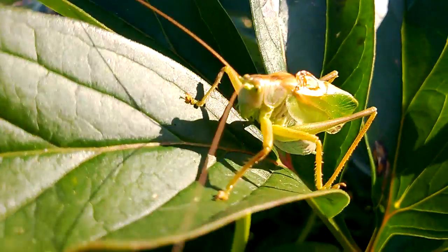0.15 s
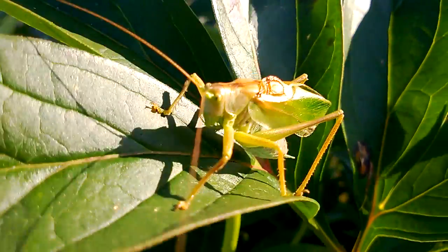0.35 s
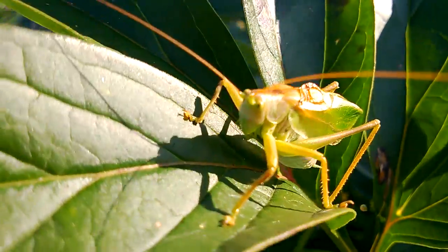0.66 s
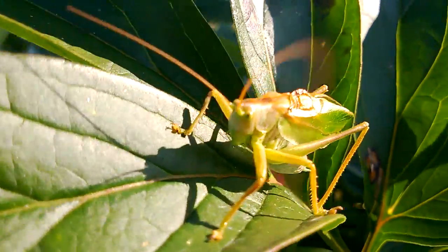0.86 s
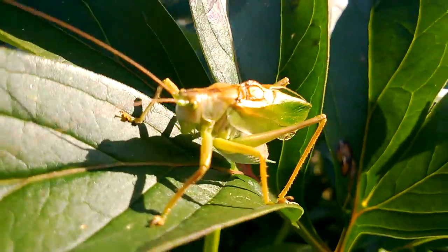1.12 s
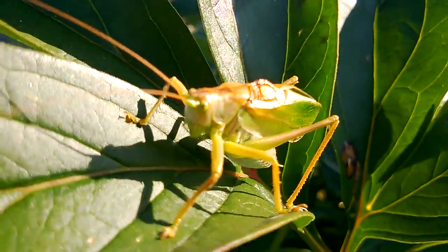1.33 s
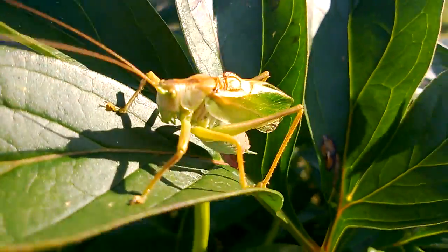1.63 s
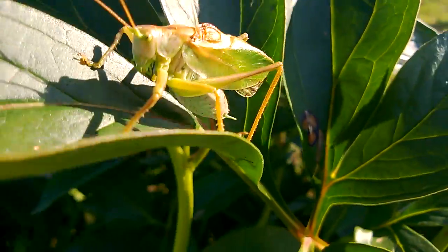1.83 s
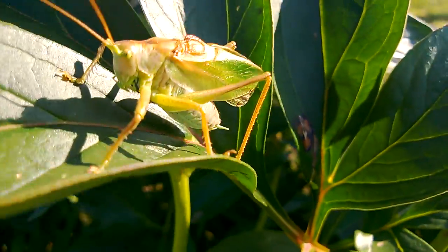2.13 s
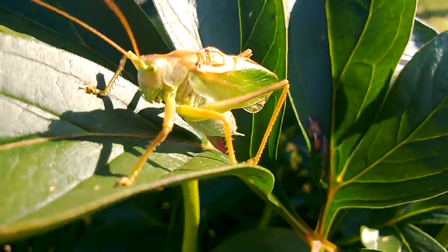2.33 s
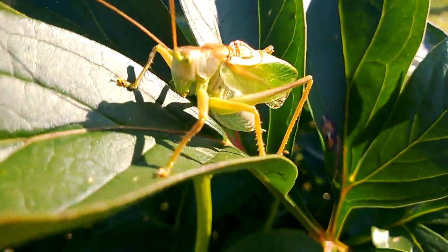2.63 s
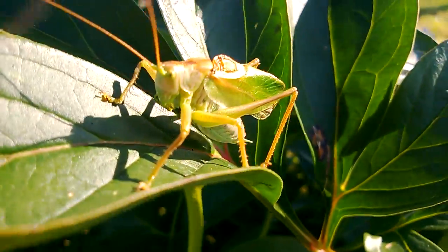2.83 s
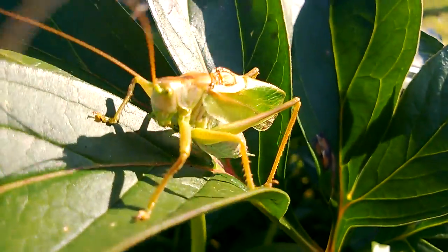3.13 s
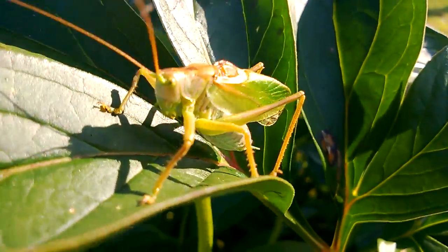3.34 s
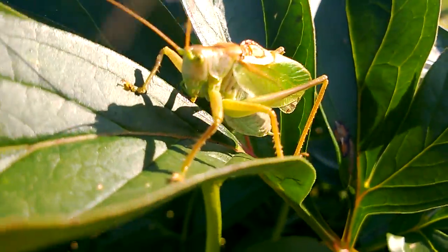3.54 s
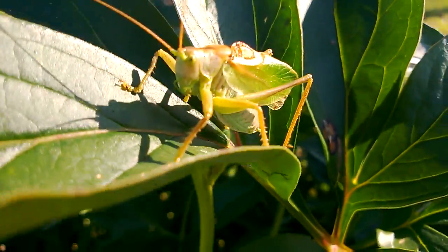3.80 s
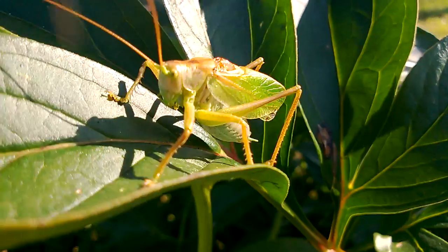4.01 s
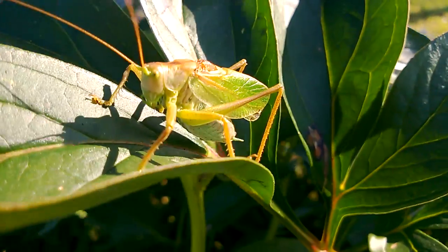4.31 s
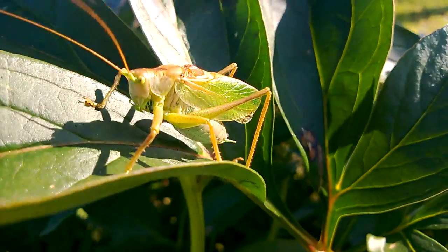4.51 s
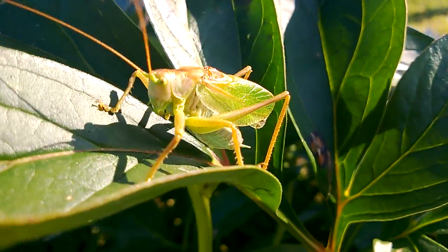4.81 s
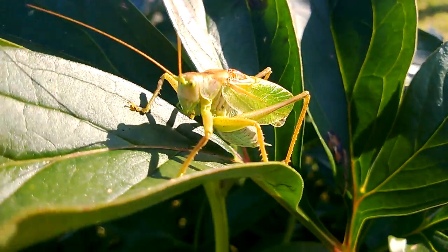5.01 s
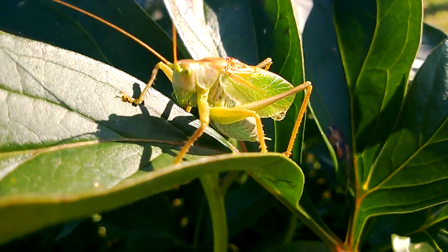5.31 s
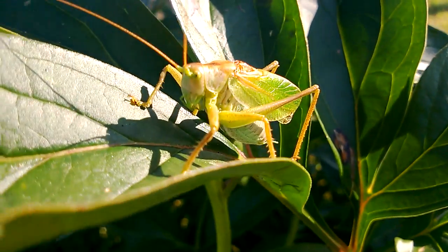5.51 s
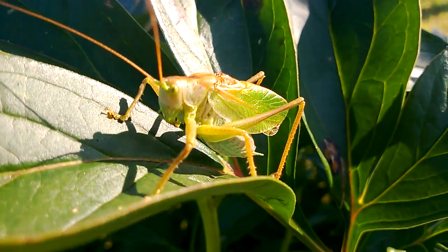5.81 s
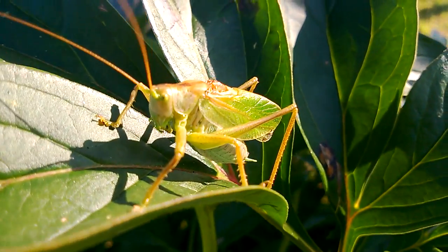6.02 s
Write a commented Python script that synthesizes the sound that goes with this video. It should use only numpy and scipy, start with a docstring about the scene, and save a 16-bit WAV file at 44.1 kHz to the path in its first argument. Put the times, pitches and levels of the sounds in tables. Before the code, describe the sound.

Wind rumbles against an unprotected microphone among leaves while an insect right beside it begins a rapid, bright, ticking trill, dry and metallic, with uneven harder snaps standing out. The gusts weaken as the trill continues. It ends abruptly around four seconds, leaving a few dull, weak puffs and a very quiet open-air hiss. In the final half second a faint far hum, perhaps a car, swells slightly.

```python
"""Bush-cricket on a leaf

A green bush-cricket sings very close, about fifty wing strokes a second, stopping dead after four seconds.
Each stroke: the scraper slips along the file in a few snaps that ring the wing, then rasps softly back.
Wind buffets the microphone as shaped noise and push-pull pulses, then dies away,
leaving a quiet garden hiss and a faint far drone of noise and rising tones, perhaps a car."""
import sys
import numpy as np
from scipy import signal
from scipy.fft import rfft, irfft, next_fast_len
from scipy.io import wavfile
from scipy.ndimage import uniform_filter1d, map_coordinates

SR = 44100
rng = np.random.default_rng(int(sys.argv[2]) if len(sys.argv) > 2 else 0)


def output_pcm(signal):
    """Save a mono or channel-first signal as 16-bit PCM at the path in sys.argv[1].

    Samples are clipped to [-1, 1] before scaling.
    """
    pcm = np.clip(np.atleast_2d(signal).T, -1, 1) * 32767
    wavfile.write(sys.argv[1], SR, np.round(pcm).astype(np.int16))


N = 271215
# Colours are relative; "before trim" levels get one more common offset in the function that uses them.

# garden air, colour: (frequency [Hz], relative level [dB])
AIR_COLOUR = [(20, 9.5), (100, 10), (250, 5), (450, 1), (900, -2), (1400, -7.5), (2300, -10), (3400, -12),
              (4500, -5.5), (5200, -9), (6500, -16), (10000, -23), (16000, -27.5)]
# garden air, rms: (time [s], level [dB])
AIR_LEVEL = [(0, -73), (4.3, -73.5), (4.95, -71.5), (5.4, -73.5), (6.15, -71.5)]
# light wind between the gusts, before trim: (time [s], level [dB])
BREEZE = [(0, -53.5), (.1, -34), (1.55, -33.5), (1.64, -48.5), (3.6, -46), (3.75, -58.5), (4.0, -48.5),
          (4.35, -61.5), (5.5, -61), (5.85, -69), (6.15, -61)]
# gusts on the microphone, before trim: (start [s], length [s], level [dB], extra flutter [dB])
GUSTS = [(0.089, 0.13, -29, -3), (0.262, 0.076, -27, 3), (0.396, 0.165, -28.5, -2),
         (0.657, 0.11, -24.5, -3), (0.815, 0.2, -27.0, -1.5), (1.128, 0.19, -28, -2),
         (1.34, 0.051, -25.0, 4), (1.426, 0.15, -27, 0.5), (1.682, 0.04, -40.5, -0.5),
         (1.773, 0.15, -39.5, 1), (2.036, 0.125, -35, 0.5), (2.241, 0.085, -35.5, 5),
         (2.406, 0.02, -38.5, -2), (2.56, 0.13, -32.5, 3), (2.751, 0.23, -37, -2.5),
         (3.05, 0.066, -32.5, -4), (3.182, 0.14, -42.0, 1.5), (3.377, 0.07, -38.5, 5.5),
         (3.477, 0.078, -32.5, 2.5), (3.601, 0.061, -40, 5), (3.839, 0.07, -37, -6),
         (3.956, 0.035, -43.0, 8), (4.041, 0.1, -34, 6), (4.215, 0.069, -39, -2.5),
         (4.387, 0.055, -41.5, -10), (4.6, 0.08, -50.5, -0.5), (4.821, 0.06, -52, -0.5),
         (4.952, 0.076, -50.5, 0), (5.14, 0.14, -56.5, 0), (5.351, 0.1, -52.5, 0),
         (6.054, 0.05, -53.0, -0.5)]
# deep wind noise, colour: (frequency [Hz], relative level [dB])
RUMBLE_COLOUR = [(12, -37), (20, -5), (59, 4.5), (144, -4), (220, -12.5), (290, -39), (480, -120)]
# higher wind noise, colour: (frequency [Hz], relative level [dB])
FLUTTER_COLOUR = [(130, -33.5), (210, 2.5), (310, -3.5), (500, -18), (800, -33), (1200, -40), (2000, -56.5)]
# weakest wind puffs, colour: (frequency [Hz], relative level [dB])
PUFF_COLOUR = [(15, -3.5), (30, -0.5), (60, -2.5), (100, -10.5), (150, -20), (250, -39)]
# wing beat: (time [s], rate [strokes/s])
PACE = [(.2, 46.18), (.35, 50.26), (.7, 50.73), (1.5, 50.12), (2.0, 49.87), (2.6, 51.14), (3.3, 49.55),
        (3.7, 48.52), (4.0, 43.91)]
# ordinary strokes, before trim: (time [s], level [dB])
EFFORT = [(0.2, -61.5), (0.245, -48), (0.26, -38.5), (0.45, -34), (0.63, -32.5), (0.76, -27), (1.35, -26),
          (1.64, -27.5), (1.76, -24.5), (2.1, -28.5), (2.6, -29.5), (3.0, -28.5), (3.25, -30), (3.62, -28),
          (4.0, -32)]
# hard catches on every n-th stroke, before trim: (first catch [s], last catch [s], n [strokes], level [dB])
CATCHES = [(0.26, 0.346, 4, -30.5), (0.448, 0.683, 2, -26), (0.978, 1.178, 2, -25.5),
           (1.238, 1.339, 5, -22.5), (1.496, 1.593, 5, -23.5), (1.674, 1.754, 2, -21.5),
           (1.815, 1.855, 2, -20.7), (1.896, 1.997, 1, -23), (2.038, 2.274, 3, -22), (2.315, 2.432, 2, -22),
           (2.492, 2.649, 2, -21.3), (2.806, 2.825, 1, -23.5), (2.943, 3.026, 1, -24),
           (3.063, 3.084, 1, -23.5), (3.145, 3.204, 3, -22.3), (3.244, 3.324, 1, -23.3),
           (3.384, 3.467, 2, -25), (3.735, 3.777, 2, -26)]
# basic wing response on closing: (frequency [Hz], relative level [dB])
CLOSING_COLOUR = [(1650, -73.5), (2800, -44.5), (4240, -34), (5890, -20.5), (6430, -21), (6820, -14.5),
                  (7330, -4), (7720, -1.5), (9130, -5.5), (10000, -9), (11300, -17), (12700, -19.5),
                  (14600, -17.5), (16000, -23.5)]
# basic wing response on opening: (frequency [Hz], relative level [dB])
OPENING_COLOUR = [(1200, -38.5), (3200, -39), (5200, -26.5), (5900, -14), (6900, -25), (8000, -8),
                  (9000, 1), (9900, -8.5), (11500, -15.5), (16000, -17.5)]
# narrow resonances of the wing cells: (frequency [Hz], width [Hz], lift [dB])
WING_CELLS = [(5950, 97, 2), (9040, 230, 2.5), (12000, 300, 2.5), (13100, 250, 1), (14800, 300, 2)]
# treble of the wing response, relative: (time [s], around 10 kHz [dB], around 14 kHz [dB])
TREBLE = [(.2, -8.5, -12), (.5, -4, -6.5), (.75, 2.5, -5), (1.5, 1.5, -4.5), (1.8, -0.5, 0.5),
          (2.5, -1, -0.5), (3.3, -1, -1.5), (3.6, 7.5, 4), (4.0, -2, 3.5)]
# faint dry hiss under the song, colour: (frequency [Hz], relative level [dB])
HUSH_COLOUR = [(700, -26), (1300, -11.5), (1900, -3.5), (2600, -2.5), (3400, -4.5), (5000, -11.5)]
# single eddies striking the port, before trim: (time [s], peak [dB])
BUFFETS = [(0.686, -13), (0.712, -18), (0.824, -16.5), (0.845, -12.5), (0.93, -18.5), (1.205, -19),
           (1.248, -15.5), (1.348, -12), (1.357, -13.5), (1.388, -13), (1.442, -17.5), (1.552, -15),
           (2.584, -21.5), (2.658, -23), (3.101, -26.5), (4.129, -33)]
# hardest catches jolting the leaf, peak of the noise envelope: (time [s], level [dB])
JOLTS = [(1.816, -55), (2.355, -53), (3.085, -47)]
# dull tick of the leaf, colour: (frequency [Hz], relative level [dB])
LEAF_TICK_COLOUR = [(250, -9), (650, 0), (1100, -5.5), (2000, -14), (3500, -13.5)]
# far drone, common gain of its noise and tones: (time [s], gain [dB])
DRONE_GAIN = [(0, -110), (5.2, -97), (5.5, -81), (5.75, -75.5), (5.98, -72.5), (6.15, -78.5)]
# noise part of the drone, colour: (frequency [Hz], relative level [dB])
DRONE_COLOUR = [(400, -25.5), (540, -4), (630, -2), (690, -6.5), (730, -1.5), (770, -6.5), (830, 1),
                (940, -3.5), (1020, -4), (1200, -6.5), (1450, -28)]
# faint tones in the drone: (frequency at DRONE_PITCH_S [Hz], amplitude before the drone gain [dB])
DRONE_TONES = [(540, -14), (630, -10), (725, -10.5), (820, -9), (900, -14.5)]

TIME = np.arange(N) / SR
STROKE_SIZE = 2048     # samples in the frame of one stroke
STROKE_TIME = (np.arange(STROKE_SIZE) - STROKE_SIZE // 2) / SR
STROKE_HZ = np.arange(STROKE_SIZE // 2 + 1) * SR / STROKE_SIZE

# a gust is stronger in its middle than at its ends by GUST_ARCH_DB
GUST_ATTACK_S, GUST_RELEASE_S, GUST_ARCH_DB = .008, .013, 2.5
# flutter level at a given wind level; its dB per dB of wind
FLUTTER_DB, FLUTTER_AT_DB, FLUTTER_GROWTH = -47.5, -30.0, 1.7
# below CALM_DB the wind turns into dull puffs, fully so over CALM_RANGE_DB
CALM_DB, CALM_RANGE_DB = -43.0, 7.0
FIRST_STROKE_S = .2015
# as the song goes on the slips spread apart, the return stroke grows and the low ring fades
SLIP_GAP_S, SLIP_SPREAD_S_PER_S = .0012, .00053
RETURN_DB, RETURN_RISE_DB_PER_S = -19.5, 3
LOW_RING_DB, LOW_RING_FADE_DB_PER_S = 5.5, 3
FIRST_RING_DB, FIRST_RING_S = 12, .12     # extra low ring in the first strokes; its decay time
RETURN_DELAY_S, RETURN_LAG = .0073, 1     # at the usual period; share of any extra period added to it
USUAL_PERIOD_S, USUAL_DB = .02, -28.5
MAIN_RING_DB, RING_DB_PER_DB = 1.25, .7     # at USUAL_DB; harder singing rings the mirror more
DRONE_RISE_PER_S, DRONE_PITCH_S = .05, 7.3     # share by which the tones climb; time of their listed pitch
CUTOFF_HZ = 15900


def from_db(db):
    """Decibels to gain."""
    return 10 ** (np.asarray(db) / 20)


def rms_one(x):
    """Each row scaled to rms 1."""
    return x / np.sqrt(np.mean(x ** 2, axis=-1, keepdims=True) + 1e-30)


def read(rows, times):
    """Columns of a curve at the given times."""
    s, *columns = np.transpose(rows)
    return [np.interp(times, s, column) for column in columns]


def at_hz(points, hz):
    """Spectrum in dB, joined on a log-frequency axis."""
    f, db = np.transpose(points)
    return np.interp(np.log(hz + 1), np.log(f), db)


def bell(x, centre, width):
    """Smooth hump of height 1."""
    return np.exp(-.5 * ((x - centre) / width) ** 2)


def noise(colour):
    """Steady coloured noise, rolled off around its last point; rms 1."""
    size = next_fast_len(N, real=True)
    hz = np.arange(size // 2 + 1) * SR / size
    rolloff = 1 + (hz / colour[-1][0]) ** 4
    gain = from_db(at_hz(colour, hz)) / rolloff
    white = rng.standard_normal(size)
    return rms_one(irfft(rfft(white) * gain, size)[:N])


def drift(rate_hz):
    """Slow random curve with rms 1, one new knot per 1 / rate_hz."""
    knots = rng.standard_normal(2000)
    return rms_one(np.interp(TIME * rate_hz, np.arange(len(knots)), knots))


def garden_air():
    """Soft outdoor hiss: coloured noise at a slowly changing level."""
    return from_db(read(AIR_LEVEL, TIME)[0]) * noise(AIR_COLOUR)


def wind_level():
    """Breeze plus gusts that rise, arch and fall: level and extra flutter, in dB."""
    power, extra_sum = from_db(read(BREEZE, TIME)[0]) ** 2, 0
    for start_s, length_s, db, extra_db in GUSTS:
        since_s = TIME - start_s
        before = np.maximum(-since_s, 0) / GUST_ATTACK_S
        after = np.maximum(since_s - length_s, 0) / GUST_RELEASE_S
        fade = np.exp(-np.minimum(before + after, 20))
        arch = np.sin(np.pi * np.clip(since_s / length_s, 0, 1)) - 2 / np.pi     # mean zero
        gust_power = (from_db(db + GUST_ARCH_DB * arch) * fade) ** 2
        power = power + gust_power
        extra_sum = extra_sum + gust_power * extra_db
    return 10 * np.log10(power), extra_sum / power


def wind(lumpy_db, rumble_db, puff_db):
    """Turbulence at the port: dull puffs when weak, lumpy rumble when stronger, flutter in hard gusts."""
    level_db, extra_db = wind_level()
    lumps_db = lumpy_db * drift(55)
    rumble = from_db(level_db + rumble_db + .5 * lumps_db) * noise(RUMBLE_COLOUR)
    flutter_db = FLUTTER_DB + FLUTTER_GROWTH * (level_db - FLUTTER_AT_DB) + extra_db + lumps_db
    flutter = from_db(flutter_db) * noise(FLUTTER_COLOUR)
    puffs = from_db(level_db + puff_db) * noise(PUFF_COLOUR)
    calm = np.clip((CALM_DB - level_db) / CALM_RANGE_DB, 0, 1)
    return np.sqrt(1 - calm) * rumble + flutter + np.sqrt(calm) * puffs


def strokes(jitter_s, uneven_db):
    """Time, level and ordinary level of each stroke; a hard catch replaces the nearest stroke."""
    singing_s = TIME[(TIME >= PACE[0][0]) & (TIME <= PACE[-1][0])]
    turns = np.cumsum(read(PACE, singing_s)[0]) / SR
    whole_turns = np.arange(int(turns[-1]) + 1)
    at_s = FIRST_STROKE_S + np.interp(whole_turns, turns, singing_s - singing_s[0])
    chance = rng.standard_normal((len(at_s), 2))
    usual_db, = read(EFFORT, at_s)
    at_s = at_s + jitter_s * chance[:, 0]
    level_db = usual_db + uneven_db * chance[:, 1]
    for first_s, last_s, every, db in CATCHES:
        first, last = np.argmin(abs(at_s - first_s)), np.argmin(abs(at_s - last_s))
        caught = np.arange(first, last + 1, every)
        at_s[caught] = np.linspace(first_s, last_s, len(caught))
        level_db[caught] = db + uneven_db * chance[caught, 1]
    return at_s, level_db, usual_db


def wing_colour(low_db, ring_db, shoulder_db, treble_db):
    """Wing response per stroke: low ring, the mirror's main ring, a shoulder above it, small cells."""
    fixed_db = at_hz(CLOSING_COLOUR, STROKE_HZ)
    for hz, width_hz, lift_db in WING_CELLS:
        fixed_db = fixed_db + lift_db * bell(STROKE_HZ, hz, width_hz)
    fixed_db = fixed_db - 5.44 * bell(STROKE_HZ, 8180, 1110)     # the tooth rate supplies part of the peak
    low = low_db[:, None] * bell(STROKE_HZ, 3460, 380)
    ring = (ring_db[:, None] - 1.0) * bell(STROKE_HZ, 7820, 492)
    shoulder = shoulder_db[:, None] * bell(STROKE_HZ, 10330, 750)
    treble = (treble_db[:, None] + 2.0) * bell(STROKE_HZ, 14200, 1650)
    return fixed_db + low + ring + shoulder + treble


def resonate(force, response_db):
    """Each stroke rings a causal (minimum-phase) body of the given response; rms 1 per frame."""
    cepstrum = irfft(np.log(from_db(response_db)))
    # fold onto positive time
    cepstrum[..., 1:STROKE_SIZE // 2] *= 2
    cepstrum[..., STROKE_SIZE // 2 + 1:] = 0
    response = np.exp(rfft(cepstrum))
    return rms_one(irfft(rfft(force) * response))


def closing(gap_s, accent_db, colour_db, slip_s, build_db, scatter_db, drag_db, grit, count):
    """The scraper slips in a row of snaps, building to the last; each rakes a few teeth of the file."""
    chance = rng.standard_normal((len(gap_s), count, 3))
    spacing_s = gap_s[:, None] * np.exp(.2 * chance[..., 0])
    starts_s = spacing_s[:, :1] - np.cumsum(spacing_s, axis=1) - .0005     # column 0 is the last snap
    size_db = build_db * starts_s / .0097 + scatter_db * np.tanh(chance[..., 1])
    # an accent snaps hard twice
    size_db[:, 0] += 2.0 + .5 * accent_db
    size_db[:, 1] += 1.1 * accent_db
    starts_s = starts_s + .00018 * accent_db[:, None]
    length_s = slip_s * from_db(.24 * accent_db[:, None])     # accented slips run further
    rasp = rng.choice([-1., 1.], (len(gap_s), STROKE_SIZE))
    force = from_db(drag_db) * bell(STROKE_TIME, -.0035, .0035) * rasp
    for k in range(count):
        age_s = np.maximum(STROKE_TIME - starts_s[:, k, None], 0)
        tooth_hz = 8100 * np.exp(.11 * np.tanh(chance[:, k, 2, None]))
        # the teeth pass nearly regularly, their timing wandering a little
        wander = np.cumsum(.17 * rng.standard_normal(age_s.shape), axis=1)
        rake = np.sin(2 * np.pi * tooth_hz * age_s + wander) + grit * rasp
        envelope = age_s / length_s * np.exp(1 - age_s / length_s)
        force = force + from_db(size_db[:, k, None]) * envelope * rake
    return resonate(force, colour_db)


def opening(delay_s, treble_db, length, glide, whistle):
    """The wings part with a light rasp, its tooth rate falling as they slow; later returns last longer."""
    span_s = length * np.maximum(delay_s[:, None] - .004, .001)
    age = (STROKE_TIME - delay_s[:, None]) / span_s
    tooth_hz = 7300 * (1 - glide * np.tanh(age / 2))
    phase = 2 * np.pi * np.cumsum(tooth_hz, axis=1) / SR
    tones = np.sin(phase) + .99 * np.sin(2 * phase)
    teeth = rng.standard_normal(age.shape) + whistle * tones
    colour_db = at_hz(OPENING_COLOUR, STROKE_HZ) + .5 * treble_db[:, None] * (STROKE_HZ > 11000)
    return resonate(teeth * bell(age, 0, .78), colour_db)


def bush_cricket(trim_db):
    """Closing and opening strokes overlaid at the times of the wing beat."""
    at_s, level_db, usual_db = strokes(jitter_s=.0006, uneven_db=1.1)
    sung_s = np.maximum(at_s - PACE[0][0], 0)
    gap_s = SLIP_GAP_S + SLIP_SPREAD_S_PER_S * sung_s
    delay_s = RETURN_DELAY_S + RETURN_LAG * (1 / read(PACE, at_s)[0] - USUAL_PERIOD_S)
    low_db = LOW_RING_DB - LOW_RING_FADE_DB_PER_S * sung_s + FIRST_RING_DB * np.exp(-sung_s / FIRST_RING_S)
    ring_db = MAIN_RING_DB + RING_DB_PER_DB * np.maximum(usual_db - USUAL_DB, -11)
    shoulder_db, treble_db = read(TREBLE, at_s)
    accent_db = np.clip(level_db - usual_db, 0, 8)
    # hard strokes ring the mirror more
    colour_db = wing_colour(low_db, ring_db + .5 * accent_db, shoulder_db, treble_db - .29 * accent_db)
    shut = closing(gap_s, accent_db, colour_db, slip_s=.00034, build_db=8.0, scatter_db=3.5,
                   drag_db=-9.0, grit=.66, count=4)
    delay_s = delay_s + rng.normal(0, .0004, len(at_s))
    part = opening(delay_s, treble_db, length=.5, glide=.16, whistle=.92)
    back_db = usual_db + RETURN_DB + RETURN_RISE_DB_PER_S * sung_s + rng.normal(0, 2.0, len(at_s))
    beats = from_db(level_db)[:, None] * shut + from_db(back_db)[:, None] * part
    song = np.zeros(N)
    for s, beat in zip(at_s, beats):
        start = round(s * SR) - STROKE_SIZE // 2
        song[start:start + STROKE_SIZE] += beat
    return from_db(trim_db) * song


def leaf_echo(x, delay_s, sway, echo_db):
    """The leaf mirrors the treble; as the microphone sways, the echo's comb of peaks shifts."""
    highpass = signal.butter(3, 9800, "high", fs=SR, output="sos")
    treble = signal.sosfilt(highpass, x)
    lag_samples = delay_s * SR * (1 + sway * drift(2.3))
    echo = map_coordinates(treble, [np.arange(N) - lag_samples], order=3)
    return x + from_db(echo_db) * echo


def foliage(x, wet_db, t60_s):
    """Leaves scatter a short, faint tail of decaying noise."""
    t = TIME[:SR // 5]
    scatter = rng.standard_normal(len(t)) * from_db(-60 * t / t60_s) * (t > .001)
    scatter /= np.linalg.norm(scatter)
    return x + from_db(wet_db) * signal.fftconvolve(x, scatter)[:N]


def hush(song, level_db):
    """Faint, smooth hiss that rises and falls with the song's running rms."""
    loudness = np.sqrt(abs(uniform_filter1d(song ** 2, size=1500)))
    return from_db(level_db) * loudness * noise(HUSH_COLOUR)


def buffets(width_s, trim_db):
    """A passing eddy pushes, then pulls, or the reverse; stronger ones pass faster."""
    out = np.zeros(N)
    for s, db in BUFFETS:
        age = (TIME - s - .002) / (width_s * from_db(-.3 * (db + 18)))     # width_s holds at -18 dB
        pulse = 3 * age / (1 + age ** 2) ** 2
        out += from_db(db + trim_db) * rng.choice([-1, 1]) * pulse
    return out


def jolts(decay_s):
    """Short dull ticks from the leaf under the insect: decaying bursts of coloured noise."""
    envelope = np.zeros(N)
    for s, db in JOLTS:
        envelope += from_db(db) * (TIME >= s - .001) * np.exp(-abs(TIME - s) / decay_s)
    return envelope * noise(LEAF_TICK_COLOUR)


def far_drone():
    """Coloured noise and slowly rising, wavering tones that swell near the end."""
    climb = 1 + DRONE_RISE_PER_S * (TIME - DRONE_PITCH_S)
    tones = np.zeros(N)
    for hz, db in DRONE_TONES:
        cycles = hz * np.cumsum(climb + .0076 * drift(6)) / SR
        tones += from_db(db) * np.sin(2 * np.pi * cycles)
    return from_db(read(DRONE_GAIN, TIME)[0]) * (.7 * noise(DRONE_COLOUR) + tones)


def scene():
    """The insect among leaves, the wind, the garden and the drone, in mono."""
    garden = garden_air()
    gusts = wind(lumpy_db=5.0, rumble_db=-1.1, puff_db=2.0)
    song = leaf_echo(bush_cricket(trim_db=-3.5), delay_s=.000599, sway=.06, echo_db=-9.0)
    song = foliage(song, wet_db=-25.5, t60_s=.07)
    song_hiss = hush(song, level_db=-44.5)
    eddies = buffets(width_s=.0016, trim_db=-2.5)
    ticks = jolts(decay_s=.0015)
    return (garden + gusts + song + song_hiss + eddies + ticks + far_drone())[None]


def record(dry):
    """Steep elliptic low-pass at the top."""
    lowpass = signal.ellip(10, .2, 80, CUTOFF_HZ, fs=SR, output="sos")
    return signal.sosfilt(lowpass, dry)


dry = scene()
out = record(dry)
output_pcm(out)
```